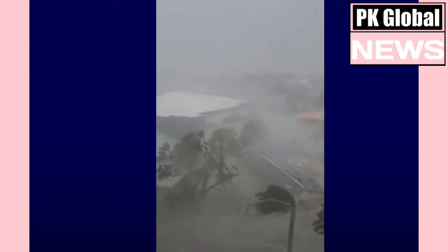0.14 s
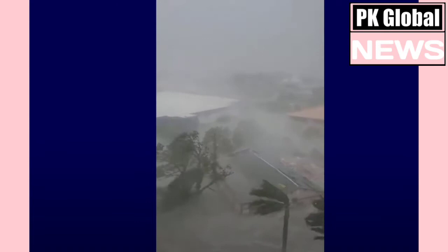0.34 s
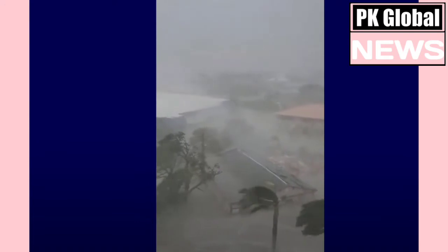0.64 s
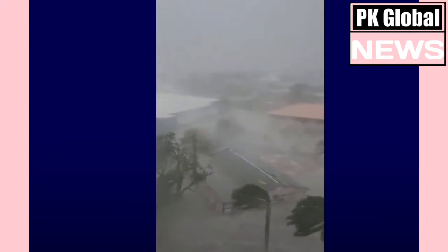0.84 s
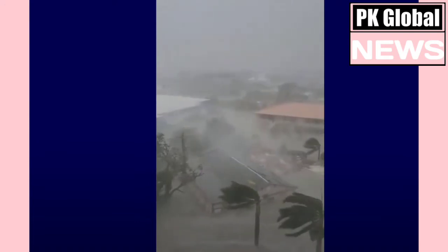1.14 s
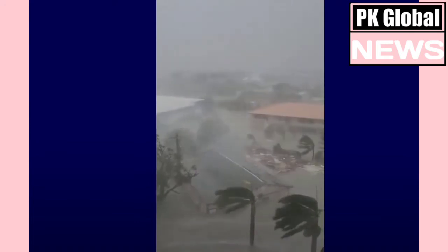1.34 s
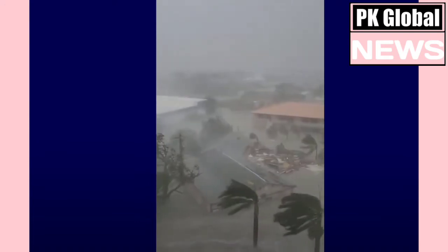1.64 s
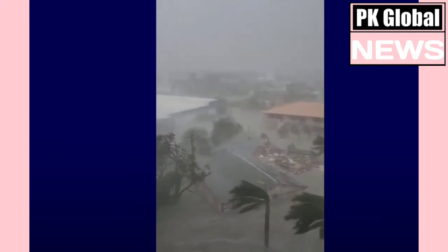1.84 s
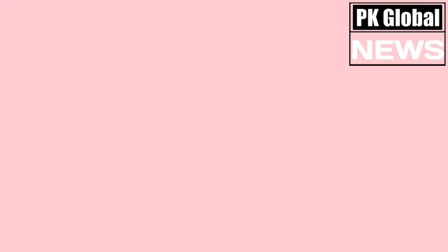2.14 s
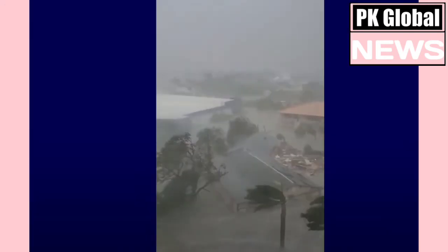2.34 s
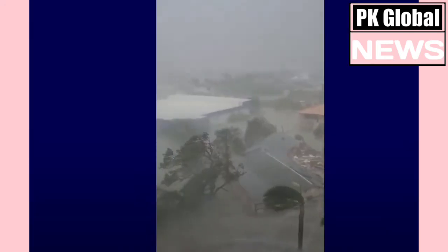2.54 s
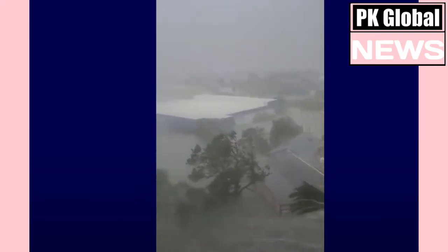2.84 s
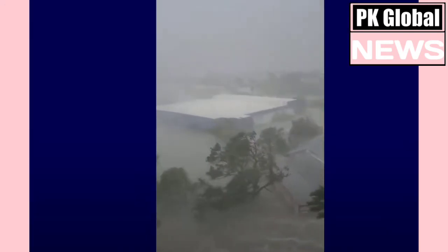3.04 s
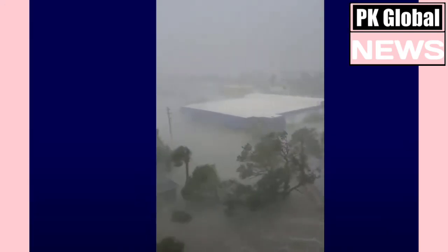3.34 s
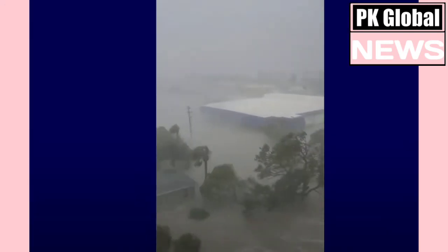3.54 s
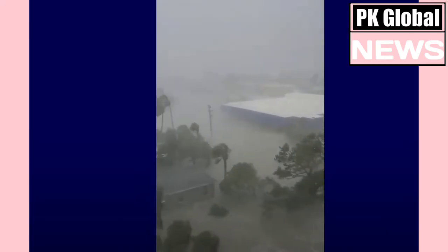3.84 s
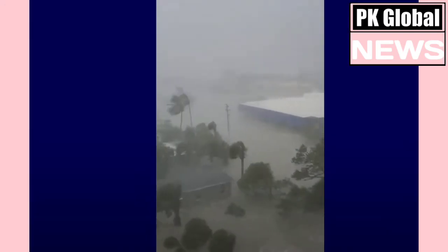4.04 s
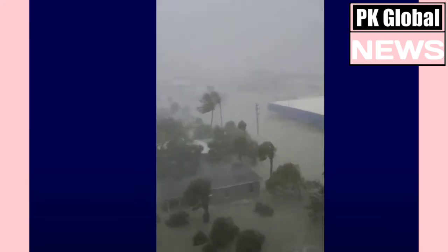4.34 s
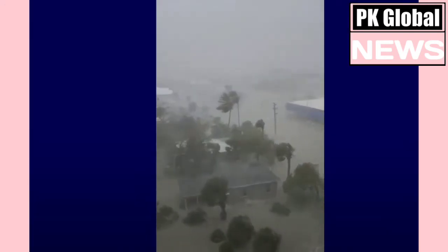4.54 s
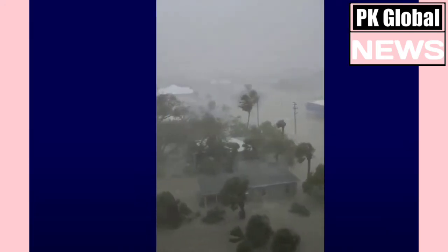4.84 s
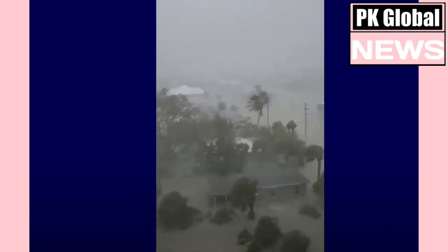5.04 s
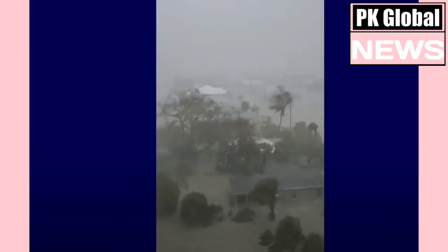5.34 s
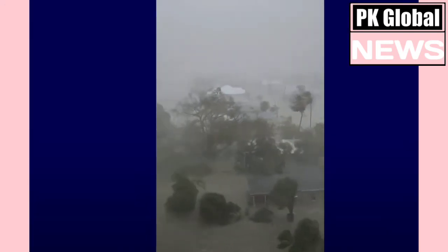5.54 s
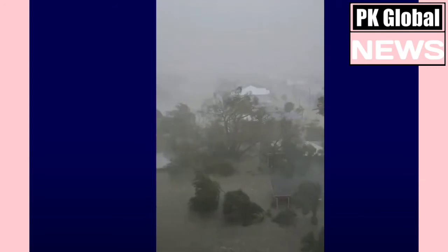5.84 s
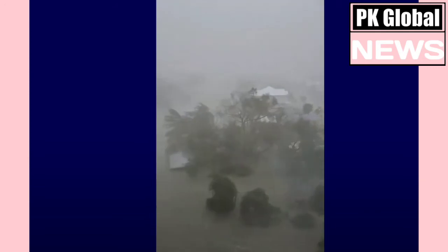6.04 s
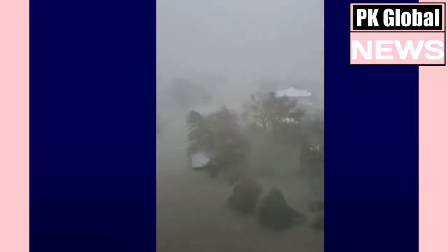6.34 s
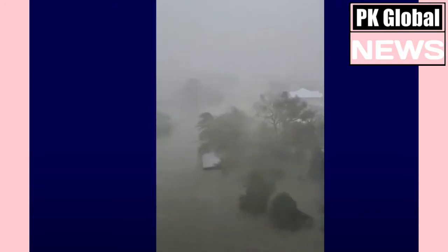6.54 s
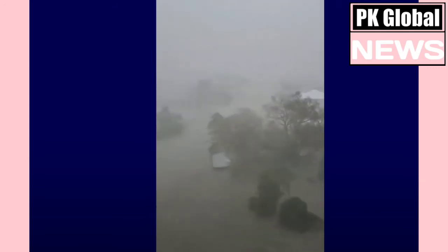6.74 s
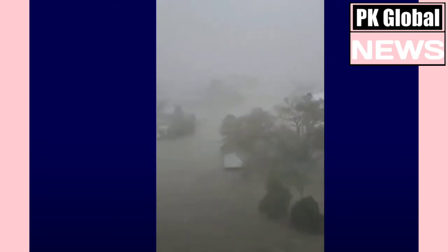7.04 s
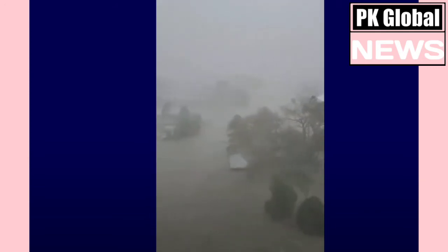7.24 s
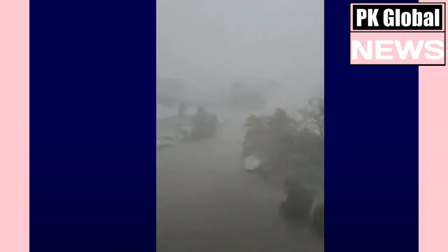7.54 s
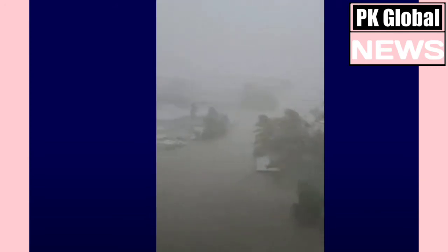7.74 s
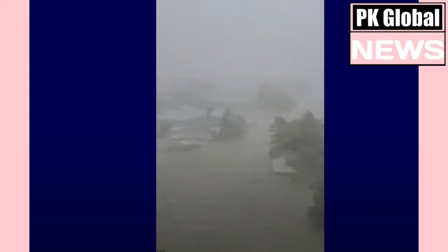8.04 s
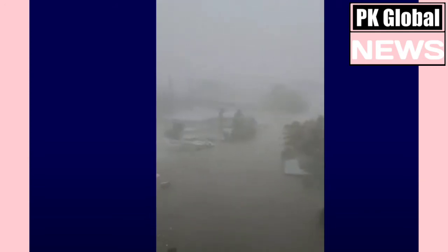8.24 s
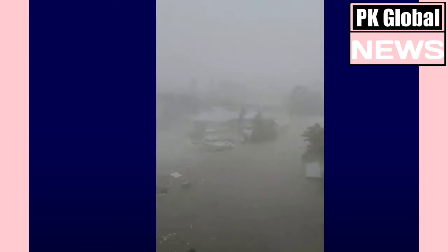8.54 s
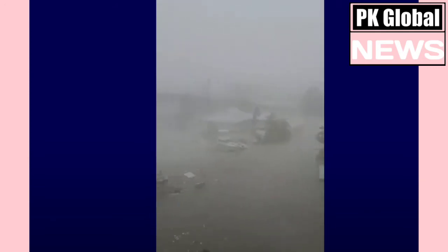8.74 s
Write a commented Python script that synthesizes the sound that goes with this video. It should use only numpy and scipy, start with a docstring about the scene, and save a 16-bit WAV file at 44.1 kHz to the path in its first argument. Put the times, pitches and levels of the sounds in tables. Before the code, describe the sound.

A hurricane heard outdoors from high above a flooded town, lasting about 8.9 seconds. From the start, a loud, wide wind roar through trees and roofs mixes with a dense rain hiss in quick uneven sheets, with a faint howl underneath. Around 1.0 to 1.5 s, gusts slap the microphone with hollow flaps and puffs. From 1.9 to 2.2 s there is complete silence, with abrupt edges. The storm returns at once; from 2.5 to 3.0 s thuds crowd together, peaking in a huge low boom at 2.86 s while roar and rain weaken. It is quieter until the roar rises around 4.3 s, with another heavy blow at 4.64 s. From 5 to 6.6 s fluttering, puffing and thumping buffet left and right irregularly over reduced storm noise. About 6.7 to 7.6 s is steadier, then roar and rain swell near 8.1 s with lighter slaps, easing at the end.

```python
"""A high spot over a flooded town in a hurricane: wind roars through trees and roofs, sheets of rain hiss.
Roar, howl and rain are coloured noise from all sides, heard at two closely spaced microphone ports.
Eddies of air buffet each port with rumbling, flapping and fluttering noise, and single eddies slap the ports.
The sound cuts out once for about a third of a second."""
import sys
import numpy as np
from scipy import signal
from scipy.fft import rfft, irfft, next_fast_len
from scipy.io import wavfile
from scipy.ndimage import uniform_filter1d, minimum_filter1d, map_coordinates

SR = 44100
rng = np.random.default_rng(int(sys.argv[2]) if len(sys.argv) > 2 else 0)


def transcribe(u):
    """Save the signal u as a 16-bit wav file named by the first command-line argument.

    u: samples, shape (n,) or (channels, n), limited to [-1, 1]; the rate is SR.
    q: integer samples, one column per channel.
    """
    v = np.clip(np.atleast_2d(u).T, -1, 1)
    q = np.round(v * 32767).astype(np.int16)
    wavfile.write(sys.argv[1], SR, q)


N = 391431  # length in samples
OPPOSED = np.array([[1], [-1]])  # plus at the left port, minus at the right


def amp(db):
    """Turn decibels into gain."""
    return 10 ** (np.asarray(db) / 20)


def unit(x):
    """Scale a signal to rms 1."""
    return x / np.sqrt(np.mean(x ** 2) + 1e-20)


def white_pair():
    """Two unrelated white noises, one for each port."""
    return rng.standard_normal((2, N))


def curves(rows):
    """Join table rows by straight lines: one value per sample for each column after the time."""
    times, *columns = np.transpose(rows)
    return [np.interp(np.arange(N) / SR, times, column) for column in columns]


def wobble(rate):
    """A smooth random curve through `rate` random points a second."""
    points = rng.standard_normal(int(N * rate / SR) + 4)
    return map_coordinates(points, [np.arange(N) * rate / SR])


def filtered(x, response):
    """Multiply the spectrum of x by a function of frequency."""
    length = next_fast_len(N + SR // 2)  # spare room so the end does not wrap onto the start
    hz = np.fft.rfftfreq(length, 1 / SR)
    return irfft(rfft(x, length) * response(hz), length)[..., :N]


def coloured(x, spectrum):
    """Shape x by the points of a spectrum, joined on a log frequency axis, and scale to rms 1."""
    f, db = np.transpose(spectrum)
    return unit(filtered(x, lambda hz: amp(np.interp(np.log(hz + 1), np.log(f), db))))


def patchy(patchy_db):
    """Two unrelated noises whose bands flicker together in small, brief patches."""
    bands = signal.stft(white_pair(), nperseg=512)[2]
    field = rng.standard_normal(bands.shape[1:])
    field = uniform_filter1d(field, size=2, axis=0)  # across frequency
    field = uniform_filter1d(field, size=6, axis=1)  # across time
    flicker = amp(patchy_db * np.minimum(unit(field), 1))
    return signal.istft(bands * flicker, nperseg=512)[1][:, :N]


def blend(pair, alike):
    """Mix two unrelated signals into left and right with likeness -1 (opposed) to 1 (the same)."""
    turn = np.arccos(np.clip(alike, -1, 1)) / 2
    mid, side = np.cos(turn) * pair[0], np.sin(turn) * pair[1]
    return np.array([mid + side, mid - side])


def all_around(pair, spacing):
    """Sound from the whole horizon: alike at both ports in the bass, opposed where half a wave fits between."""
    sound_speed = 343  # m/s; spacing is in m
    shadow_hz = 6000  # around here and above, the microphone's body shields one port from the other

    def mid_and_side(hz):
        angles = (np.arange(16) + .5) * np.pi / 32
        lags = spacing / sound_speed * np.cos(angles)
        shadow = 1 / (1 + (hz / shadow_hz) ** 4)
        alike = shadow * np.mean(np.cos(2 * np.pi * lags[:, None] * hz), axis=0)
        return np.sqrt([(1 + alike) / 2, (1 - alike) / 2])
    mid, side = filtered(pair, mid_and_side)
    return np.array([mid + side, mid - side])


# Colour of the wind in trees and roofs, and of the howl, before scaling: (f/Hz, relative level/dB)
ROAR_SPECTRUM = [(30, -30), (55, -9), (88, -3), (130, -10), (180, -7.5), (250, -6), (340, -2.5),
                 (480, -2.5), (640, -2.2), (880, -6.5), (1280, -8), (1520, -16.5), (2000, -17),
                 (2700, -23.5), (5000, -66.5)]
HOWL_SPECTRUM = [(350, -20.5), (520, -3), (720, 1), (900, -4.5), (1200, -8), (1550, -17), (2500, -39)]


def roar(storm_db, level_db=2.5, swirl_db=0.12, howl_db=-33, howl_grows=1.5, full_storm_db=-25):
    """Wind tears through distant trees and around roofs; a howl grows faster than the roar as the storm rises."""
    air = coloured(all_around(patchy(patchy_db=4.0), spacing=0.082), ROAR_SPECTRUM)
    howl = coloured(all_around(patchy(patchy_db=4.0), spacing=0.11), HOWL_SPECTRUM)
    air_gain = amp(storm_db + level_db + swirl_db * wobble(30))
    howl_gain = amp(howl_db + howl_grows * (storm_db - full_storm_db))
    return air_gain * air + howl_gain * howl


def splashes(rate=40, decay_s=0.06):
    """Flung water lands at random moments: each splash starts at once and dies away. Mean about 0, rms 1."""
    landings = (rng.random(N) < rate / SR) - rate / SR
    return unit(signal.lfilter([1], [1, -np.exp(-1 / (decay_s * SR))], landings))


# Colour of the rain hiss, before scaling: (f/Hz, relative level/dB)
RAIN_SPECTRUM = [(400, -8), (1100, -5.5), (1450, -4), (2000, -2), (3000, -0.5), (4200, -5), (5300, -8),
                 (6600, -7), (7500, -17.5), (9000, -13), (13000, -13.5)]


def rain(storm_db, level_db=-0.5, drops_db=-10, drop_rate=450, scatter_db=3.0, splash_db=0.5):
    """Countless far drops merge into hiss that comes in splashes; nearer ones tick through it."""
    hits = rng.random((2, N)) < drop_rate / SR  # drop_rate is drops per second at each port
    sizes = amp(scatter_db * np.clip(white_pair(), -2, 2))
    drops = unit(hits * sizes * rng.choice([-1, 1], (2, N)))
    spray = patchy(patchy_db=7.0) + amp(drops_db) * drops
    hiss = coloured(all_around(spray, spacing=0.075), RAIN_SPECTRUM)
    return amp(storm_db + level_db + splash_db * splashes()) * hiss


def eddies(shared_db, own_db, rate):
    """Lumpy gain of turbulence: large eddies cover both ports, small ones only one; their strength saturates."""
    shared = np.tanh(wobble(rate / 2))
    own = np.tanh([wobble(rate), wobble(rate)])
    return unit(amp(shared_db * shared + own_db * own))


# Turbulence that stays on the ports between gusts, slight at first, before the surges and gains of buffeting:
# (t/s, rumble level/dB, flap level/dB, flutter level/dB)
DRAUGHT = [(0, -46.5, -57.5, -39.5), (3, -36, -40.5, -35.5), (4.5, -36, -46, -35), (5.3, -36, -38, -30),
           (7, -36.5, -41, -36), (8.88, -38, -41, -34.5)]
# Gusts that reach the ports, before the same surges and gains:
# (peak t/s, length/s, rumble level/dB, flap level/dB, flutter level/dB)
GUSTS = [(1.05, 0.38, -38, -41, -33), (1.448, 0.32, -34, -32, -29), (1.8, 0.11, -39, -36, -29),
         (2.378, 0.74, -29.5, -40, -31), (2.72, 0.14, -29, -34, -27), (2.857, 0.17, -27, -27, -24),
         (3.15, 0.3, -34, -42, -39), (4.2, 0.3, -38, -42, -38), (4.422, 0.19, -30, -31, -24),
         (4.55, 0.1, -33, -36, -32), (4.66, 0.16, -28, -32, -26), (4.99, 0.12, -37, -35, -28),
         (5.168, 0.11, -37, -36, -25), (5.26, 0.08, -32, -39, -30), (5.547, 0.17, -31, -31, -25),
         (5.852, 0.12, -38, -37, -26), (6.08, 0.12, -36, -38, -32), (6.233, 0.2, -23, -44, -29),
         (6.47, 0.24, -36, -42, -35), (7.634, 0.14, -40, -41, -37), (8.04, 0.27, -35, -34, -28),
         (8.494, 0.29, -35.5, -42, -34), (8.61, 0.12, -35, -40, -26), (8.87, 0.18, -39, -42, -24)]


def gusts():
    """Strength of rumble, flap and flutter: each gust swells and dies as a bell, adding power to the draught."""
    t = np.arange(N) / SR
    power = amp(curves(DRAUGHT)) ** 2
    for peak_s, length, *levels_db in GUSTS:
        bell = np.exp(-(2 * (t - peak_s) / length) ** 2)
        power = power + (amp(levels_db)[:, None] * bell) ** 2
    return np.sqrt(power)


# Colours of turbulence at the ports, before scaling: (f/Hz, relative level/dB)
RUMBLE_SPECTRUM = [(15, -14), (30, -15.5), (50, -6.5), (72, -3), (110, -8), (200, -14.5), (500, -56),
                   (1500, -94.5)]
FLAP_SPECTRUM = [(50, -38), (110, -2), (155, -2), (230, -3), (330, -9.5), (700, -41), (2000, -75)]  # also colours the flap of the slaps
FLUTTER_SPECTRUM = [(50, -44), (120, -14.5), (220, -6), (400, 1), (700, -11.5), (1000, -14), (1500, -27.5),
                    (3000, -49), (8000, -56)]
PORT_RING_SPECTRUM = [(150, -29.5), (300, -9.5), (390, 1), (480, -3.5), (620, -13), (800, -14.5),
                      (1400, -29.5), (3000, -55.5)]


def buffeting(flap_gain_db=-1.0, flutter_gain_db=-1.5, ring_gain_db=-7, surge_db=2.0):
    """Turbulence on the ports: deep rumble, hollow flap, tearing flutter with a ring opposed at the two ports."""
    surge = amp(surge_db * wobble(12))  # all three surge together at random
    rumble_strength, flap_strength, flutter_strength = gusts() * surge

    rumble = blend(coloured(white_pair(), RUMBLE_SPECTRUM), alike=0.17)
    rumble = rumble * eddies(shared_db=4.5, own_db=6, rate=40)

    flap = coloured(white_pair(), FLAP_SPECTRUM) * eddies(shared_db=4.5, own_db=4.0, rate=60)

    ring = amp(ring_gain_db) * coloured(rng.standard_normal(N), PORT_RING_SPECTRUM) * OPPOSED
    flutter = coloured(white_pair(), FLUTTER_SPECTRUM) + ring
    flutter = flutter * eddies(shared_db=4.5, own_db=4.5, rate=100)
    return (rumble_strength * rumble + amp(flap_gain_db) * flap_strength * flap
            + amp(flutter_gain_db) * flutter_strength * flutter)


# Colour of the puff in a slap, before scaling: (f/Hz, relative level/dB)
PUFF_SPECTRUM = [(100, -26), (260, -3.5), (380, 1), (600, -1), (850, -8), (1200, -16.5), (1600, -22),
                 (3000, -43), (8000, -57)]
# Single eddies that slap the ports, levels before the gains of slaps: (peak t/s, half the rise time/s,
# thud level/dB, flap level/dB, puff level/dB, left over right level/dB,
# likeness of the thud at the two ports, held within -1..1)
SLAPS = [(0.936, .009, -26, -39, -33, -2, 0.79), (1.131, 0.0046, -25, -22, -18, -5, .8),
         (1.398, 0.012, -23, -22.5, -36, 2, .1), (1.475, 0.0072, -27, -18, -22, 2, .9),
         (2.489, .009, -24, -34, -28, 3, .5), (2.609, 0.01, -21.5, -22, -22, -3, 0.42),
         (2.695, 0.0047, -24, -23, -38, -2, .7), (2.73, 0.0099, -26, -31, -26.5, 14, -0.11),
         (2.774, 0.005, -19, -15, -20, -1, 0.99), (2.829, 0.0054, -18, -21, -23.5, 3, .95),
         (2.86, 0.011, -7, -18, -24, 2, -.9), (2.905, 0.0064, -24, -20, -28, 8, -.2),
         (2.923, .006, -24, -34, -30, 4, 0), (2.94, .011, -25, -35, -28, 10, 0),
         (2.978, 0.011, -23, -34, -33, 5, .7), (3.019, 0.0099, -19.5, -25, -33, -3, 0.2),
         (4.365, 0.0087, -33, -28, -30, -4, .5), (4.413, .008, -17, -22, -23, -3, -.9),
         (4.519, 0.0088, -22, -38, -37, 2, .4), (4.572, 0.0042, -38, -40, -20, 2, .5),
         (4.595, .006, -24, -28, -40, 2, 0.98), (4.642, 0.0062, -9, -14.5, -20, 0, -1.06),
         (4.665, 0.0098, -37, -24, -24, 0, 0), (4.707, 0.0068, -31, -26, -27, -2, .5),
         (4.804, 0.013, -24, -43, -33.5, -7, -0.0071), (4.997, 0.0089, -22, -28, -29, -7, 0),
         (5.012, 0.0072, -18, -31, -47, -11, -.4), (5.195, 0.0051, -35, -27, -17, -3, .1),
         (5.22, .007, -21.5, -26, -36, -2, .7), (5.249, 0.0081, -24, -28, -31, 3, 1),
         (5.267, 0.0025, -27, -28, -26, 0, .9), (5.421, 0.008, -33, -35, -22.5, 7, .6),
         (5.485, 0.0066, -34, -30, -28, -8, .6), (5.505, 0.012, -25, -28, -28, -7, -0.3),
         (5.565, 0.0084, -24, -29, -21, 8, .95), (5.603, 0.0052, -27, -31, -17.5, 0, .9),
         (5.618, 0.0054, -13, -34, -33, 3, .8), (5.664, 0.013, -20, -32, -33, -3, -0.96),
         (5.745, .009, -26, -30, -28, 15, .6), (5.768, 0.0081, -28, -33, -38, 19, 0.72),
         (5.811, .006, -26, -32, -35, -2, 0.42), (5.835, 0.012, -39, -41, -23, 0, .6),
         (5.866, .007, -36, -26, -23, 12, .4), (5.887, 0.005, -25, -36, -36, 10, 0.81),
         (5.917, 0.011, -29, -32, -23.5, -5, .6), (5.989, 0.0047, -16.5, -36, -26.5, -1, -0.49),
         (6.05, 0.0064, -38, -35, -21, 0, .6), (6.09, 0.011, -36, -34, -22.5, 3, .5),
         (6.163, 0.0041, -20, -32, -18.5, 1, .85), (6.19, 0.0082, -36, -37, -15.5, 0, .8),
         (6.216, 0.0045, -24, -40, -32, 9, .95), (6.245, 0.013, -21, -35, -25.5, -3, -0.86),
         (6.319, 0.0065, -22, -37, -22, -2, 0.72), (6.37, .012, -37, -39, -23.5, 6, .3),
         (6.47, 0.0074, -25, -30, -28, -5, .5), (6.619, 0.014, -31, -31, -25.5, -5, -0.87),
         (7.772, 0.0095, -23, -40, -44, -2, .9), (7.947, 0.0099, -21, -38, -21.5, 5, .95),
         (8.074, .008, -30, -29, -29, 10, 0.98), (8.36, .007, -32, -26, -46, 8, .5),
         (8.465, 0.0074, -25, -34, -38, -9, .6), (8.59, 0.015, -29, -31, -19.5, 1, 0.74),
         (8.66, 0.0062, -25, -22, -27, 4, .95), (8.691, 0.0059, -31, -30, -23, -1, .5)]


def slaps(thud_gain_db=-1.3, puff_gain_db=0.2, thud_hz=74, hz_scatter=0.16, puff_lean=0.36):
    """Each strong eddy is a push of pressure that swings briefly, with a hollow flap and a puff on top."""
    out = np.zeros((2, N))
    t = np.arange(-SR // 32, SR // 8) / SR  # time around the peak, s
    flaps = blend(coloured(white_pair(), FLAP_SPECTRUM), alike=0.055)
    puffs = blend(coloured(white_pair(), PUFF_SPECTRUM), alike=0.2)
    for peak_s, half_rise, thud_db, flap_db, puff_db, lean_db, alike in SLAPS:
        pitch, phase = rng.standard_normal(2)
        span = round((peak_s + t[0]) * SR) + np.arange(len(t))
        age = np.maximum(t / half_rise / 2 + 1, 0)  # 0 at the start, 1 at the peak
        swell = (age * np.exp(1 - age)) ** 3
        turn = 2 * np.pi * thud_hz * np.exp(hz_scatter * pitch) * t + np.pi * phase
        thud = blend([np.sin(turn), np.cos(turn)], alike)

        # thud and flap lean fully to the port that is hit harder; the puff spreads more evenly
        sides_db = lean_db / 2 * OPPOSED
        parts = ((thud, thud_db + thud_gain_db + sides_db),
                 (flaps[:, span], flap_db + sides_db),
                 (puffs[:, span], puff_db + puff_gain_db + puff_lean * sides_db))
        for wave, db in parts:
            out[:, span] += amp(db) * unit(swell * wave) * np.sqrt(np.mean(swell ** 2))
    return out


# Strength of the storm, before sheets and layer levels: (t/s, level/dB)
STORM = [(0.0, -25.3), (0.2, -24.5), (1.1, -24.2), (1.35, -26), (1.62, -26.5), (1.75, -25), (2.3, -25.5),
         (2.52, -25.5), (2.6, -28), (2.78, -29), (2.86, -32), (3.0, -31.5), (3.9, -31.5), (4.15, -29.5),
         (4.35, -26.5), (4.6, -25.5), (4.73, -31.5), (5.3, -32), (6.1, -33.5), (6.8, -32.5), (7.35, -31.5),
         (8.1, -27), (8.88, -30.5)]


def scene(sheets_db=0.86):
    """One storm strength drives both the roar and the rain, which sweep past in quick sheets."""
    storm_db, = curves(STORM)
    storm_db = storm_db + sheets_db * wobble(24)
    return roar(storm_db) + rain(storm_db) + buffeting() + slaps()


def limited(x, ceiling_db=-3.6, hold_s=0.014):
    """The recorder ducks both sides for a moment when a blast would pass its ceiling."""
    need = np.minimum(1, amp(ceiling_db) / (np.abs(x).max(axis=0) + 1e-9))
    span = max(2, int(hold_s * SR))
    return x * uniform_filter1d(minimum_filter1d(need, span), span)


# The moment of silence: (start t/s, end t/s)
SILENCE = (1.8995, 2.2165)


def record(dry, top_hz=13100):
    """Blasts are limited, the sound drops out once, and a steep filter removes what lies above top_hz."""
    t = np.arange(N) / SR
    live = (t < SILENCE[0]) | (t > SILENCE[1])
    return filtered(limited(dry) * live, lambda hz: 1 / (1 + (hz / top_hz) ** 200))


dry = scene()
out = record(dry)
transcribe(out)
```